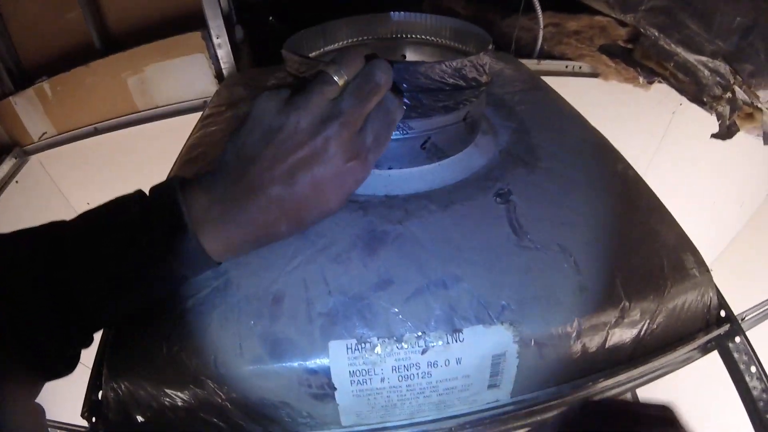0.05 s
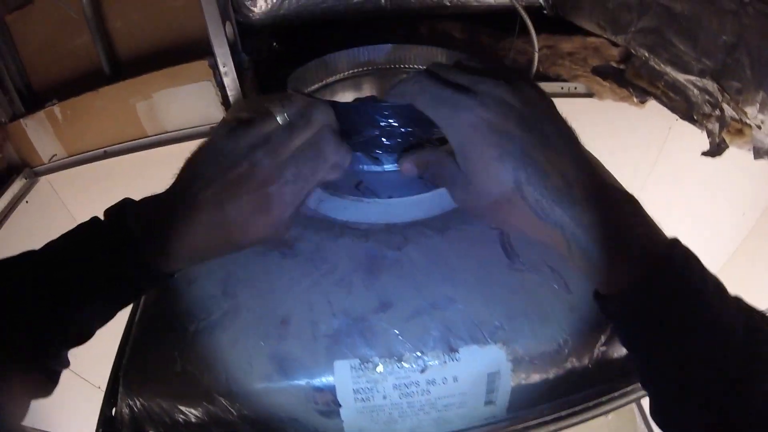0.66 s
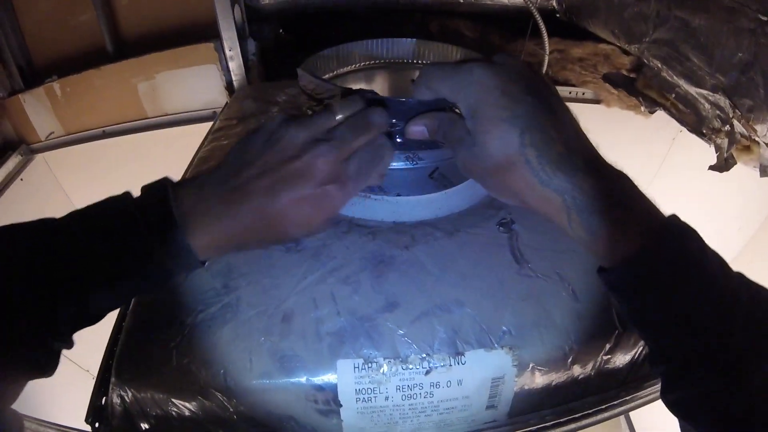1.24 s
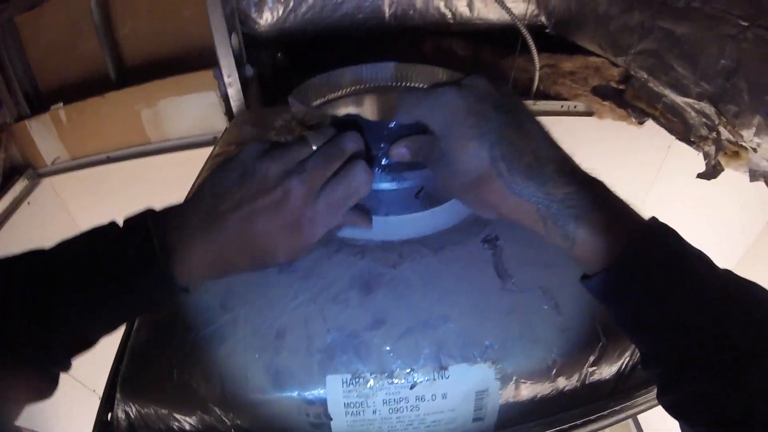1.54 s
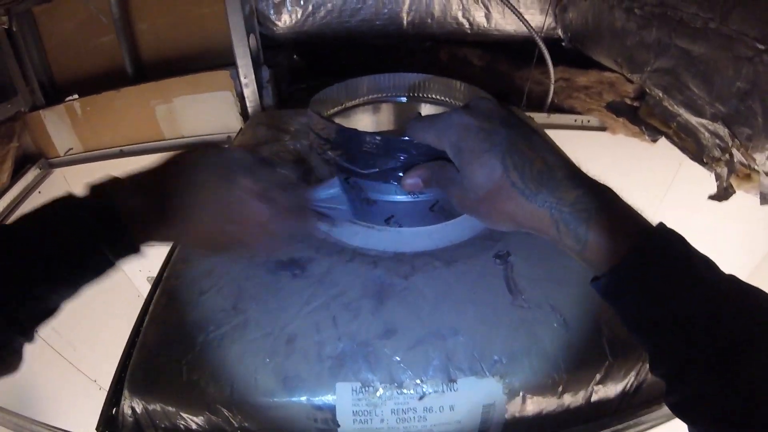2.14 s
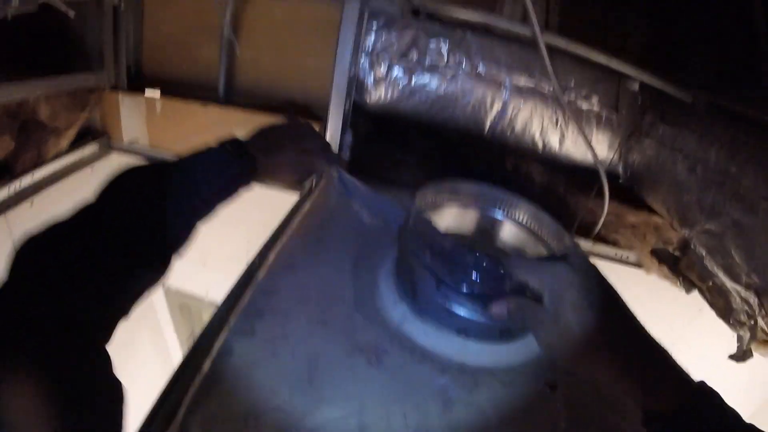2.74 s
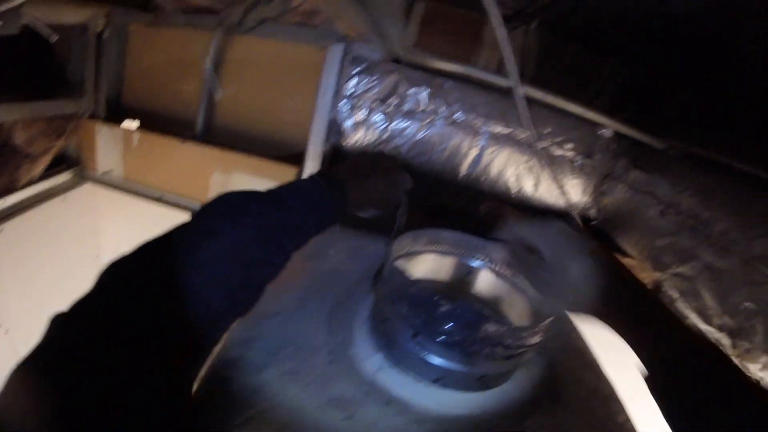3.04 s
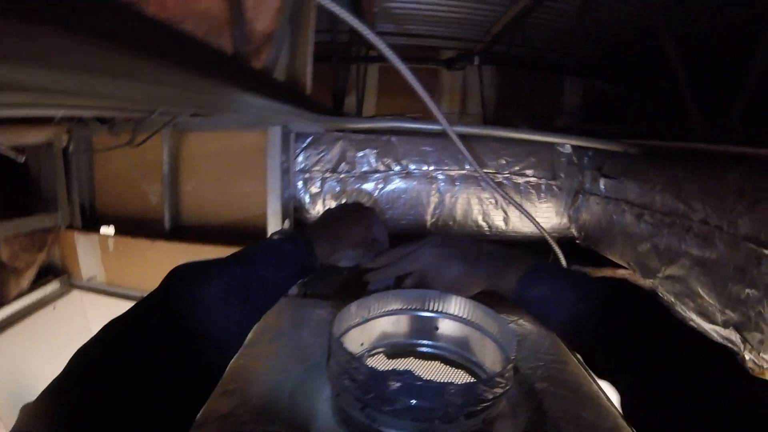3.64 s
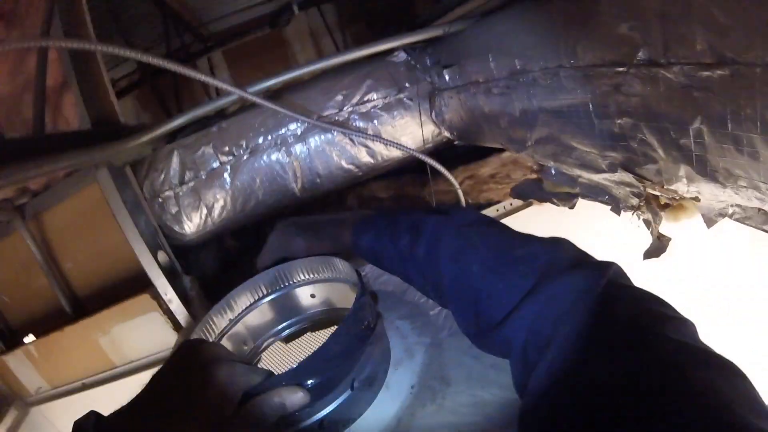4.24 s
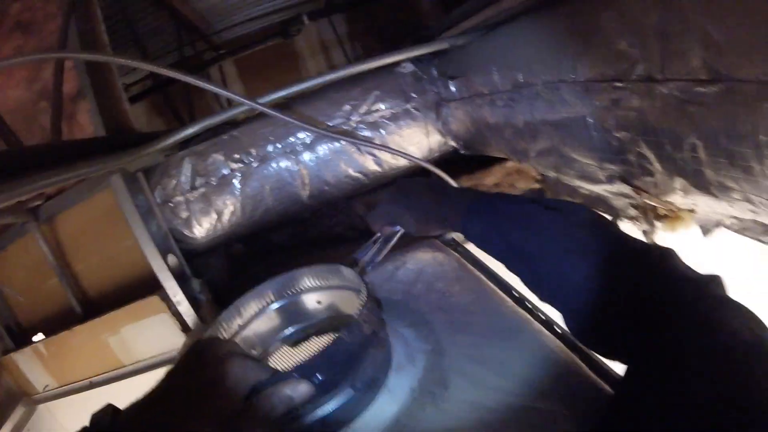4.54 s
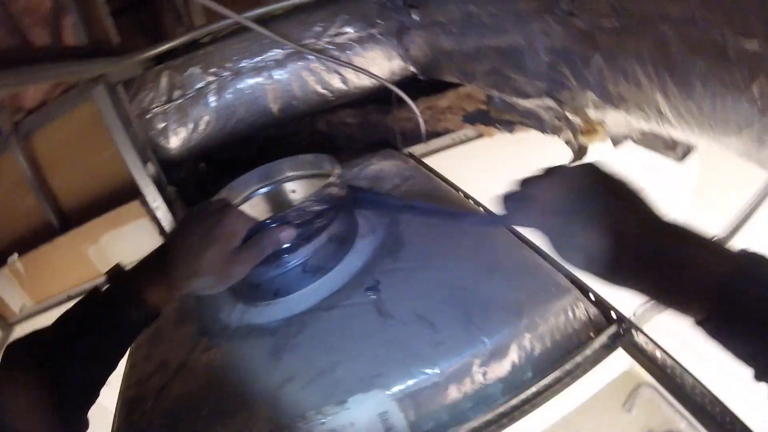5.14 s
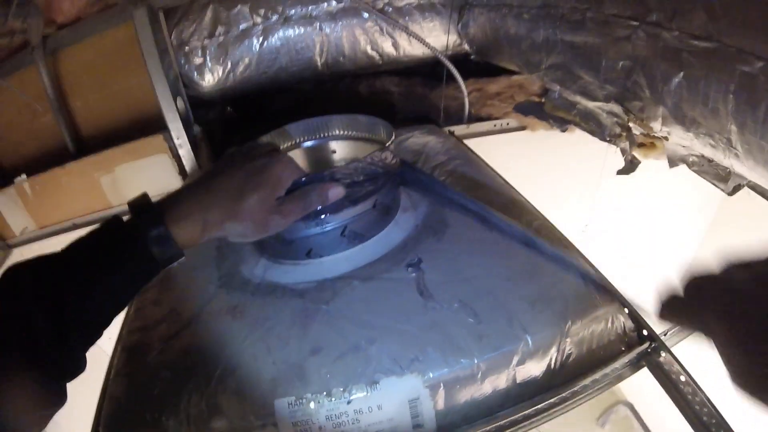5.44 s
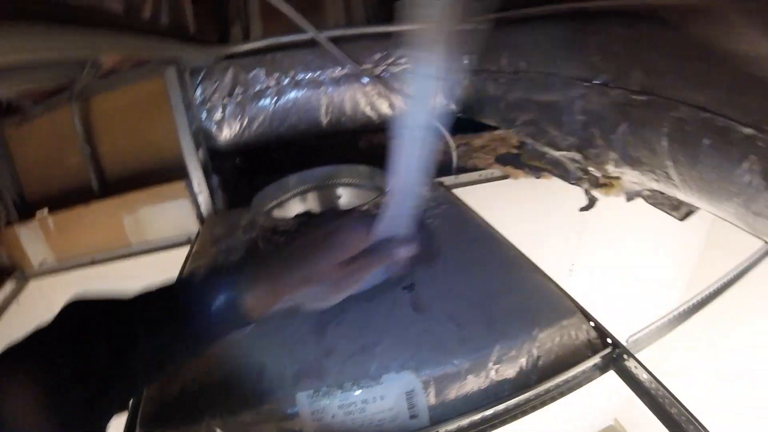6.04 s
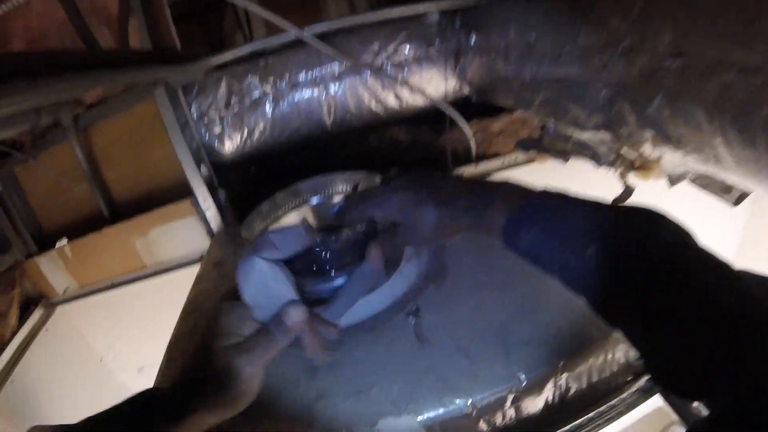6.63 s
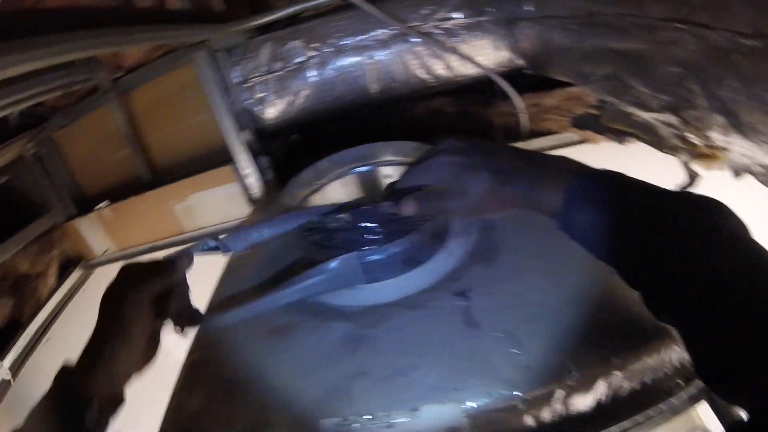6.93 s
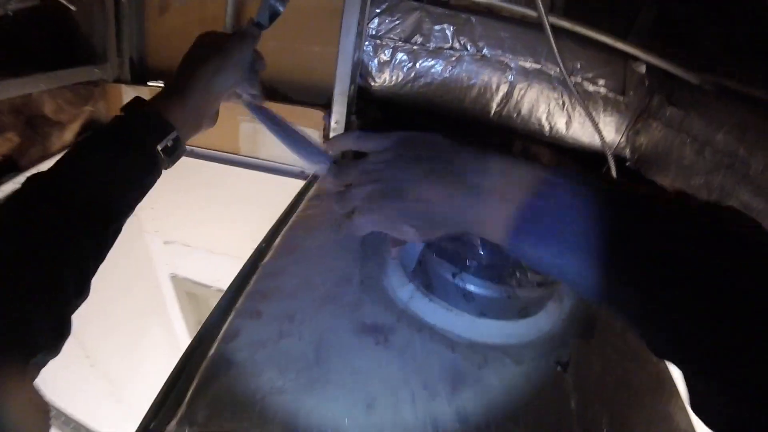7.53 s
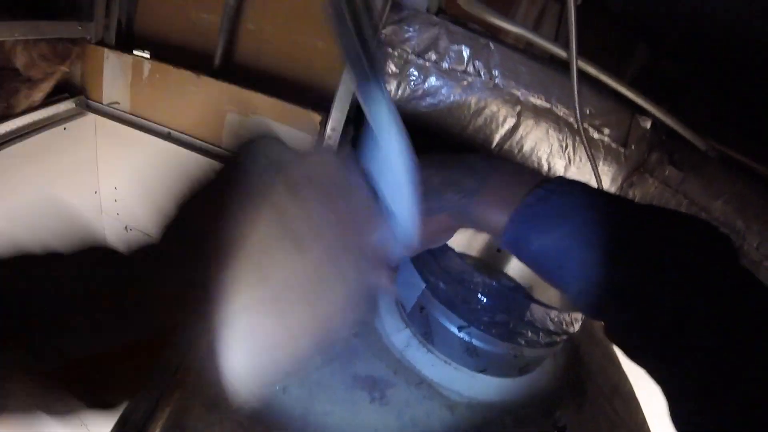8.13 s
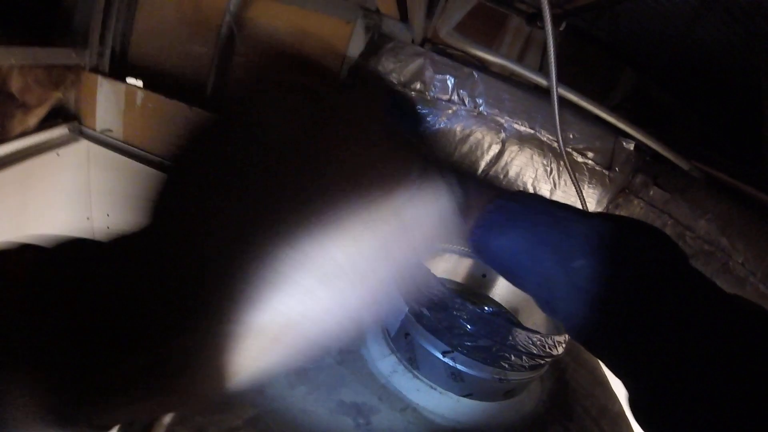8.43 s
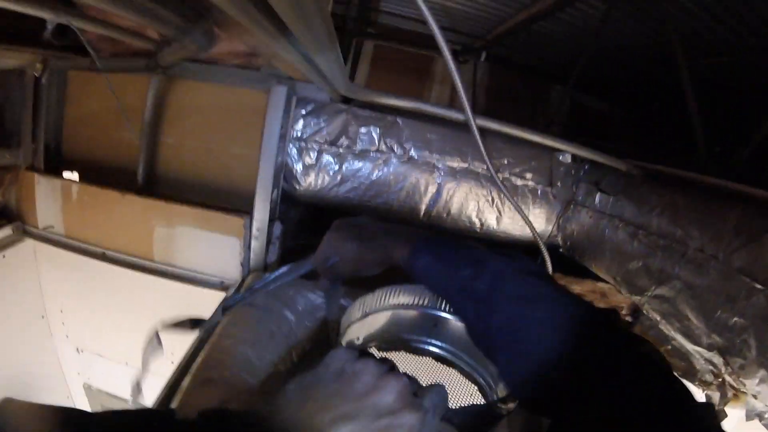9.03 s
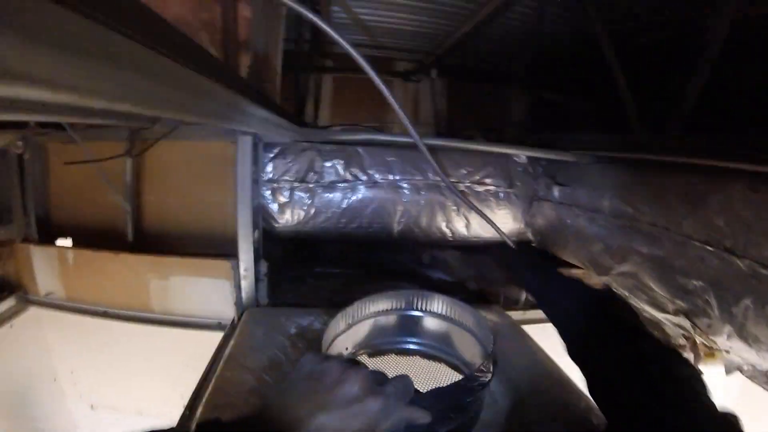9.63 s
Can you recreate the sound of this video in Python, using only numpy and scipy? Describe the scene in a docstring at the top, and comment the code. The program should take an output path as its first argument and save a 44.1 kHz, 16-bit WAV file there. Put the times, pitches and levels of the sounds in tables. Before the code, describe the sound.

Close by, fingers pick at foil tape on a sheet-metal duct collar, with light ticks, crinkles and a few soft bumps during the first two seconds. At about 2 seconds comes a short, swelling rip, then two quick tugs around 2.6. Quieter rustling and dull bumps follow. Small skids lead into sharp rips at 4.4 and 4.7 seconds, then a slower, rattling pull and stronger tears from 5 to 5.7 that drum on the duct. Foil crackles and pops from about 6.6, running into three quick rips around 7 seconds. After a lull with faint sleeve brushing, short rips, thin squeaky scrapes and dull palm thuds cluster from 8.7 to 9.8 seconds. Everything echoes only briefly in the small, dry space above a ceiling. A faint, steady ventilation hum and a thin hiss lie underneath throughout.

```python
"""Foil tape and insulation facing are picked loose and torn off a sheet-metal duct collar, close by.
In each pull the glue sticks and slips in a run of tiny snaps that blur into a rip and drum on the duct.
Around the pulls the foil pops and crinkles, fingers skid, sleeves brush and hands bump the duct.
It all echoes briefly in the small, dry space above a ceiling.
Behind it are a faint ventilation hum and the microphone's own thin hiss."""
import sys
import numpy as np
from scipy import signal
from scipy.fft import rfft, irfft
from scipy.io import wavfile
from scipy.ndimage import uniform_filter1d, map_coordinates

SR = 44100
rng = np.random.default_rng(int(sys.argv[2]) if len(sys.argv) > 2 else 0)


def unload_wav(signal):
    """Save mono or channel-first audio to the path in sys.argv[1] as 16-bit WAV at rate SR, clipped to [-1, 1]."""
    wavfile.write(
        sys.argv[1],
        SR,
        np.round(np.clip(np.atleast_2d(signal).T, -1, 1) * 32767).astype(np.int16),
    )


N = 431298

# Pulls on the strip. A fade is the time to drop 60 dB; a swell is the level change over the pull.
# (start [s], length [s], rip fade [s], rip level [dB], rip swell [dB], drumming level [dB],
# drumming swell [dB], first slip rate [1/s], last slip rate [1/s])
PULLS = [ (2.0327, 0.26, 0.18, -29, 6.5, -36, 6, 89.4, 394),
         (2.5237, 0.048, 0.51, -28, 0.5, -40, 7.5, 168, 380),
         (2.667, 0.067, 0.039, -24.5, 7, -34, 1.5, 450, 324),
         (4.392, 0.13, .11, -22.5, -0.5, -28, -3, 570, 980),
         (4.738, 0.12, 0.064, -26, 6.5, -32, 1.5, 535, 980),
         (5.059, 0.26, 0.6, -34, -5, -42, 11.5, 60.2, 69.3),
         (5.368, 0.14, 0.2, -23.5, -8, -20.5, -12.5, 113, 147),
         (5.532, 0.15, 0.19, -22, 2, -25, -2.5, 204, 796),
         (6.8307, .06, .1, -24, -1, -33.5, -0.5, 129, 169),
         (6.896, 0.2, 0.14, -22, -4, -32, -5.5, 330, 110),
         (7.101, 0.078, 0.065, -21.5, -3, -45.5, 7.5, 312, 55),
         (8.779, .065, 0.054, -35.5, 1.5, -42.5, -1, 110, 140),
         (8.857, 0.039, 0.13, -26, 2.5, -29.5, -5, 670, 480),
         (9.577, 0.082, 0.1, -28.5, 1, -32.5, -2.5, 650, 555), ]
# How the strip is held, one row a pull: (panel pitch [Hz], panel level [dB], drumming bass cut [Hz],
# strip resonance [Hz], its boost [dB], relative collar ring [dB], rasp of one slip [s])
GRIPS = [ (322, -4.5, 130, 2000, 6, -6, 0.00096), (262, -2, 140, 3300, 0.5, -7.5, 0.00088),
         (483, -5, 80, 5200, -1, 1.5, 0.00079), (363, 9, 99, 2800, 3, -5, .002),
         (332, 5, 45, 2200, 0.5, -6, .002), (180, 3, 58, 2200, -3, 5.5, 0.003),
         (183, 5, 26, 1700, -10, 1, 0.0059), (200, -10, 66, 1860, -3.5, 5.5, 0.0018),
         (260, 4, 130, 4900, 4, 1.5, 0.00092), (607, -0.5, 230, 3800, 4, 2.5, 0.0021),
         (517, -21, 190, 3100, 4, 2.5, 0.0023), (476, -5, 66, 4000, 3.5, -7, .0007),
         (470, -2, 65, 800, 1, 7.5, .0013), (513, 0, 99, 2300, -0.5, 2.5, 0.0021), ]
# Single foil snaps and finger ticks: (time [s], strength [dB], tick boost [dB], knock boost [dB])
SNAPS = [(0.3806, -31.5, -27, -9), (0.416, -38, -8, -3), (.578, -40, 5, 9), (1.2234, -27, -5, -8),
         (1.2595, -30, 2.5, 1.5), (1.335, -20, -8.5, -6), (1.595, -37.5, 8, 10.5),
         (1.7971, -38.5, -19, -15), (1.93, -43, -34, -16), (1.957, -41, -23, -21), (2.0075, -32, -8, -6),
         (2.0166, -18.5, -4.5, -1.5), (2.067, -23, -13, 4), (2.412, -35.5, -2, -11), (2.4837, -36, 8, 5),
         (2.5019, -27.5, -1, -2), (4.378, -32.5, 1, 4), (4.714, -29, -8, -23), (5.1182, -33, 12, 11),
         (5.2636, -31.5, -2, 5.5), (5.3333, -24, -9, 11), (5.7497, -23.5, 3, -2.5), (5.843, -37, -20, -17),
         (6.6013, -41, -4, -9), (6.6115, -34.5, -3, -18), (6.6233, -28, 4, 4.5), (6.634, -23.5, 3, -14),
         (6.7168, -30.5, -7, 3), (6.751, -28.5, 3, 0.5), (6.7842, -29, -4, 0), (6.8102, -24.5, -1, -4),
         (7.0199, -24, -3, -23), (7.9582, -36.5, 1, -20), (8.135, -42, -2, -20), (9.1482, -23.5, -5, -4)]
# Skids on the collar:
# (start [s], length [s], level [dB], squeak pitch [Hz], squeak boost [dB], treble tilt [dB/octave])
SCRAPES = [(0.231, 0.018, -40.5, 1880, 15, -7), (1.012, 0.0092, -40, 2230, 9, -1),
           (3.407, 0.061, -48, 1400, 6, -4), (3.523, 0.013, -33.5, 6050, 9.5, -0.5),
           (4.16, 0.019, -38.5, 4740, 8, -5.5), (4.242, 0.019, -30, 3170, 11, -1.5),
           (4.309, 0.0075, -31.5, 3120, 14, 0.5), (4.661, 0.011, -35.5, 940, 20, -11),
           (8.672, 0.016, -35.5, 3470, -1.5, -0.5), (8.935, 0.021, -26.5, 980, 5, -2),
           (8.979, 0.028, -29.5, 5700, 0, 4), (9.037, 0.14, -32, 5200, 15.5, 11),
           (9.063, 0.052, -37.5, 3220, 34, 3), (9.26, 0.025, -32.5, 5500, 3, 1),
           (9.42, 0.072, -35, 6070, 6, 1.5)]
# Strokes of fingers and sleeves over the foil: (middle [s], length [s], level [dB])
STROKES = [(0.096, .3, -66.5), (.37, 0.13, -54), (0.635, 0.44, -51.5), (0.955, 0.35, -63.5),
           (1.267, 0.11, -56.5), (1.908, 0.65, -60), (2.964, 0.11, -59), (3.517, 0.16, -66),
           (3.845, .26, -60.5), (4.247, 0.24, -50.5), (4.675, 0.44, -53), (5.792, 0.086, -47),
           (6.11, 0.32, -59.5), (6.46, 0.27, -55), (6.733, 0.21, -44.5), (7.703, 0.16, -61),
           (8.035, 0.5, -54.5), (8.505, 0.27, -63), (8.884, 0.35, -45.5), (9.396, 1, -48),
           (9.78, 0.039, -43)]
# Hands bumping and leaning on the duct: (time [s], level [dB], leaning time [s])
BUMPS = [(.565, -34.5, 0.02), (0.688, -38.5, 0.013), (1.008, -39.5, 0.01), (1.111, -51, .04),
         (3.522, -45, 0.015), (3.67, -48, 0.017), (3.79, -49, .02), (4.15, -46.5, 0.038), (8.86, -35, .08),
         (8.975, -41.5, .02), (9.148, -30.5, 0.029), (9.255, -37, 0.033), (9.412, -37.5, 0.012),
         (9.58, -31, 0.059), (9.755, -30, .03)]
# The notes at which the duct panels and the collar ring: (pitch [Hz], width [Hz], relative level [dB])
DUCT_MODES = [(97, 15, -0.5), (130, 14, 2), (185.4, 28, -1.5), (251.6, 33, -2.5), (292, 31, -8.5),
              (336, 25, -3), (404, 22, -5)]
COLLAR_MODES = [(614, 47, -6), (663, 44, 5), (790, 82, -12), (867, 78, 0.5), (990, 110, -0.5),
                (1280, 95, -21), (1800, 160, -17)]
# The tone of each sound, from bass to treble: (frequency [Hz], relative level [dB])
TAPE_TONE = [(200, -13), (600, 0.5), (1200, -3), (2000, -4), (3200, -0.5), (4200, -5), (5000, -0.5),
             (6400, 0), (7000, -6), (9000, -10.5), (10500, -22.5), (11500, -27.5), (13500, -47.5),
             (15000, -10)]
CRACK_TONE = [(900, -30), (2600, -15), (3700, -7), (5000, -1), (6100, 1), (6800, -10), (8500, -17),
              (11000, -33), (15000, -46)]
TICK_TONE = [(250, -1), (750, 16.5), (1600, 8), (2600, 12.5), (4500, -22), (9000, -64)]
BRUSH_TONE = [(200, 10), (800, 3), (1500, -2.5), (3000, 0), (4100, -3.5), (5200, -1.5), (6500, 1),
              (7200, -5), (9500, -11.5), (11500, -34.5), (14000, -54)]
THUD_TONE = [(8, -31), (25, -10), (60, -2.5), (120, 2.5), (200, -10), (350, -10.5), (700, -19.5),
             (1500, -27.5), (4000, -51.5)]
# Soft air rush, with the microphone's own hiss peaking at 6400 Hz: (frequency [Hz], relative level [dB])
BACKGROUND_TONE = [(15, -17), (28, -7), (55, -6.5), (100, -5), (150, -18.5), (300, -14.5), (500, -24.5),
                   (800, -24.5), (2000, -32.5), (4000, -42), (6400, -35), (9500, -45.5), (11000, -48.5),
                   (13500, -51)]
# Three low ventilation hums, then the microphone's thin hiss: (pitch [Hz], waver rate [1/s], level [dB])
BACKGROUND_BANDS = [(90.2, 14, -49.5), (54.1, 4.2, -60), (241, 12, -71), (6500, 210, -74.5)]
# How long the space echoes: (frequency [Hz], time to drop 60 dB [s])
ECHO_FADES = [(100, 0.8), (500, 0.38), (2500, 0.3), (6000, 0.29), (12000, 0.2)]

PULL_ATTACK_S, DRUM_FADE_S = 0.0023, 0.24  # the strip comes taut; the drumming dies away
UNEVEN_DB, UNEVEN_PER_S = 1.0, 47.8  # the glue holds unevenly along the strip
FOIL_HZ, FOIL_DB = 6000, 1.5  # the foil's own bright resonance
BREAK_DB, BREAK_TICK_DB, BREAK_KNOCK_DB = -3, -4.5, 1.5  # a pull's first snap: strength vs. rip, boosts
SNAP_FADE_S, SNAP_EDGE = 0.0061, 0.55  # a snap's spray of fractures; its first click, relative to that
CREASES_PER_S, CREASE_SPREAD_DB = 55, 8.5  # tiny folds popping in handled foil
BRUSH_DB, BRIGHT_CREASE_DB, DRY_CREASE_DB = 1.5, -3.5, 1  # shares of the rustle
BUMP_ATTACK_S, BUMP_FADE_S = 0.0027, 0.34  # a soft palm; the padding settles


def tearing():
    """The glue lets go in slips; each one rasps the taut strip and tugs on the collar and the duct."""
    out, t = np.zeros(N), np.arange(2 * SR // 3) / SR
    collar = ringing(COLLAR_MODES)
    for pull, grip in zip(PULLS, GRIPS):
        start, length, fade, rip_db, swell_db, drum_db, drum_swell_db, first_rate, last_rate = pull
        panel_hz, panel_db, low_hz, strip_hz, strip_db, collar_db, rasp = grip
        progress = np.minimum(t / length, 1)
        uneven_db = UNEVEN_DB * wobble(UNEVEN_PER_S, len(t))
        rip = amp(rip_db + swell_db * progress + uneven_db) * envelope(t, PULL_ATTACK_S, length, fade)
        drum = amp(drum_db + drum_swell_db * progress) * envelope(t, PULL_ATTACK_S, length, DRUM_FADE_S)
        rate = first_rate * (last_rate / first_rate) ** (progress ** 2.2)  # changes most near the end
        tugs = slips(rate, jitter_s=0.0008, spread_db=3)
        crackle = frayed(tugs, life_s=rasp, amount=1.3)
        strip = response(lambda hz: along(TAPE_TONE, hz) + strip_db * hump(hz, strip_hz, 0.56)
                         + FOIL_DB * hump(hz, FOIL_HZ, 0.27))
        # a hand braced on the duct holds back its deepest notes
        bass_cut = signal.butter(N=2, Wn=low_hz, btype="high", fs=SR)
        duct = signal.lfilter(*bass_cut, ringing(DUCT_MODES + [(panel_hz, 100, panel_db)]))
        sound = rip * steady(through(crackle, bending(strip, delay_s=0.000805)))
        sound += drum * steady(through(tugs, duct))
        # the collar lies between strip and duct and follows both
        sound += amp(collar_db - 8.5) * np.sqrt(rip * drum) * steady(through(tugs, collar))
        add(out, start, sound)
    return out


def snaps():
    """A crease pops, a nail catches or glue first gives: foil cracks, the collar ticks, the duct knocks."""
    out, t = np.zeros(N), np.arange(SR // 5) / SR
    crack = bending(colour(CRACK_TONE), delay_s=0.00123)
    tick = bending(colour(TICK_TONE), delay_s=0.00062)
    knock = ringing(DUCT_MODES)
    breaks = [(start, rip_db + BREAK_DB, BREAK_TICK_DB, BREAK_KNOCK_DB)
              for start, _, _, rip_db, *_ in PULLS]
    for start, db, tick_db, knock_db in SNAPS + breaks:
        burst = amp(-60 * t / SNAP_FADE_S) * rng.standard_normal(len(t))
        burst /= np.linalg.norm(burst)
        burst[0] += SNAP_EDGE
        parts = [(crack, -16.5), (tick, tick_db - 22.5), (knock, knock_db - 23)]
        sound = sum(amp(db + part_db) * unit(through(burst, part)) for part, part_db in parts)
        add(out, start - 0.0005, sound)
    return out


def scrapes():
    """Fingers and foil skid on the collar, chattering into one resonance of the foil or the rim."""
    out, t = np.zeros(N), np.arange(SR // 5) / SR
    for start, length, db, squeak_hz, boost_db, tilt_db in SCRAPES:
        progress = np.minimum(t / length, 1)
        stroke = np.sqrt(np.abs(np.sin(np.pi * progress ** 0.42)))  # quick rise, slower fall
        catches = slips(np.full(len(t), 700), jitter_s=0.0011, spread_db=9.5)
        chatter = frayed(catches, life_s=0.0019, amount=1.2)
        surface = response(lambda hz: along(TAPE_TONE, hz) + boost_db * hump(hz, squeak_hz, 0.28)
                           + tilt_db * np.log2(1 + hz / 700))
        add(out, start, amp(db) * stroke * steady(through(chatter, surface), span_s=0.014))
    return out


def rustle():
    """Sleeves brush softly while tiny creases tick, bright in the foil and drier in the loose tape."""
    t = np.arange(N) / SR
    level = sum(amp(db) * np.exp(-(2 * (t - middle) / length) ** 2) for middle, length, db in STROKES)
    brush = through(rng.standard_normal(N), colour(BRUSH_TONE))
    sound = brush * amp(BRUSH_DB + 2.2 * wobble(30, N))
    for tone, db in [(CRACK_TONE, BRIGHT_CREASE_DB), (TAPE_TONE, DRY_CREASE_DB)]:
        pops = slips(np.full(N, CREASES_PER_S), jitter_s=0.03, spread_db=CREASE_SPREAD_DB)
        creases = frayed(pops, life_s=0.0012, amount=1.5)
        sheet = bending(colour(tone), delay_s=0.00119)
        sound += amp(db) * steady(through(creases, sheet), span_s=0.043)
    return level * sound


def hand_bumps():
    """Palms shift on the padded duct, which answers with dull, lumpy thuds."""
    t = np.arange(N) / SR
    level = sum(amp(db) * envelope(t - start, BUMP_ATTACK_S, lean, BUMP_FADE_S)
                for start, db, lean in BUMPS)
    shifts = slips(np.full(N, 45), jitter_s=0.015, spread_db=0.5)
    lumps = frayed(shifts, life_s=0.0051, amount=1.5)
    return level * steady(through(lumps, colour(THUD_TONE)), span_s=0.066)


def ceiling_space(x):
    """Adds echoes that keep changing as head and hands move: a new set every fifth of a second."""
    out, size = x.copy(), SR // 5
    for start in range(0, N, size):
        add(out, start / SR, signal.fftconvolve(x[start:start + size], wall_echoes()))
    return out


def wall_echoes():
    """Near metal walls answer a click within milliseconds; a weak tail follows."""
    hz, t, noise = signal.stft(rng.standard_normal(SR // 3), SR, nperseg=256)
    fading = amp(-60 * t / along(ECHO_FADES, hz)[:, None])
    _, tail = signal.istft(noise * fading, SR, nperseg=256)
    t = np.arange(len(tail)) / SR
    early = rng.standard_normal(len(t)) * amp(-60 * t / 0.041) * (t > 0.002)
    return amp(-7) * early / np.linalg.norm(early) + amp(-14) * tail / np.linalg.norm(tail)


def background():
    """Soft air rush and low, wavering hums, plus the microphone's own thin hiss near 6.5 kHz."""
    t = np.arange(N) / SR
    sound = amp(-51.5) * through(rng.standard_normal(N), colour(BACKGROUND_TONE))
    for hz, waver_rate, db in BACKGROUND_BANDS:
        phase = 2 * np.pi * hz * t + 1.7 * wobble(waver_rate, N)
        loudness = amp(1.3 * wobble(waver_rate, N))
        sound += amp(db) * unit(loudness * np.sin(phase))
    return sound


def slips(rate, jitter_s, spread_db):
    """Kicks of random size and direction, rate a second; jitter blurs fast runs more than slow ones."""
    count = np.cumsum(rate) / SR
    timing, strength, direction = rng.standard_normal((int(count[-1]), 3)).T
    where = np.searchsorted(count, np.arange(len(timing))) + jitter_s * SR * timing
    sizes = amp(spread_db * strength.clip(-2, 2)) * np.sign(direction)
    return np.bincount(where.astype(int) % len(rate), sizes, len(rate))


def frayed(kicks, life_s, amount):
    """Each kick trails a noisy spray of tiny fractures that dies away over about life_s."""
    spray = np.exp(-np.arange(SR // 20) / (life_s * SR))
    power = np.abs(through(kicks ** 2, spray / spray.sum()))
    return kicks + amount * np.sqrt(power) * rng.standard_normal(len(kicks))


def bending(ring, delay_s):
    """Bending waves in a thin sheet bring the bass later than the treble; delay_s holds at 1 kHz."""
    khz = np.fft.rfftfreq(len(ring), 1 / SR) / 1000
    phase_lag = 4000 * np.pi * delay_s * np.sqrt(khz)
    return irfft(rfft(ring) * np.exp(-1j * phase_lag))


def ringing(modes):
    """How metal rings after a tap: one peak for each note, with the treble rolled off above them."""
    def db_at(f):
        power = sum(amp(db) ** 2 * (f * width) ** 2 / ((hz ** 2 - f ** 2) ** 2 + (f * width) ** 2)
                    for hz, width, db in modes)
        rolloff_hz = 2 * max(hz for hz, _, _ in modes)
        return 10 * np.log10(1e-12 + power / (1 + (f / rolloff_hz) ** 2))
    return response(db_at, size=8192)


def colour(tone):
    """The filter for a tone table."""
    return response(lambda hz: along(tone, hz))


def response(db_at, size=4096):
    """A filter, given as its answer to one click (energy 1), whose tone follows db_at(frequency)."""
    gain = amp(db_at(np.fft.rfftfreq(size, 1 / SR)))
    cepstrum = irfft(np.log(gain + 1e-6))
    # fold it forward in time, so nothing sounds before the click
    cepstrum[1:size // 2] *= 2
    cepstrum[size // 2 + 1:] = 0
    ring = irfft(np.exp(rfft(cepstrum)))
    return ring / np.linalg.norm(ring)


def through(x, ring):
    """x passed through a filter."""
    return signal.fftconvolve(x, ring)[:len(x)]


def steady(x, span_s=0.025):
    """Evens out the loudness of x to about 1; single snaps keep their shape."""
    size = int(span_s * SR)
    power = np.abs(uniform_filter1d(uniform_filter1d(x ** 2, size), size))
    return x / np.sqrt(power + 0.0081 * np.mean(x ** 2))


def envelope(t, attack_s, hold_s, fade_s):
    """A straight rise, a hold until hold_s, then a drop of 60 dB every fade_s."""
    return np.clip(t / attack_s, 0, 1) * amp(-60 * np.maximum(t - hold_s, 0) / fade_s)


def wobble(rate, size):
    """A smooth curve through rate random points a second."""
    points = rng.standard_normal(int(size * rate / SR) + 4)
    return map_coordinates(points, [np.arange(size) * rate / SR])


def hump(hz, centre, width):
    """A bell-shaped peak of height 1 on a pitch (log-frequency) scale."""
    return np.exp(-(np.log((hz + 1) / centre) / width) ** 2)


def along(points, hz):
    """Reads between the rows of a (frequency, value) table on a pitch scale."""
    frequencies, values = np.transpose(points)
    return np.interp(np.log(hz + 1), np.log(frequencies + 1), values)


def add(track, time_s, x):
    """Mixes x into the track from time_s on."""
    start = max(round(time_s * SR), 0)
    track[start:start + len(x)] += x[:max(len(track) - start, 0)]


def amp(db):
    """Turns decibels into a gain."""
    return 10 ** (np.asarray(db) / 20)


def unit(x):
    """x scaled to an average (rms) level of 1."""
    return x / np.sqrt(np.mean(x ** 2) + 1e-20)


def scene():
    """The work on the duct with its echoes, over the steady background, in one channel."""
    work = tearing() + snaps() + scrapes() + rustle() + hand_bumps()
    return (ceiling_space(work) + background())[None]


def record(dry):
    """Rounds off the loudest peaks and cuts the highest treble."""
    peak_limit, top_hz = 0.6, 13600
    rounded = dry / (1 + np.abs(dry / peak_limit) ** 8) ** (1 / 8)
    return signal.sosfilt(signal.butter(N=16, Wn=top_hz, fs=SR, output="sos"), rounded)


dry = scene()
out = record(dry)
unload_wav(out)
```